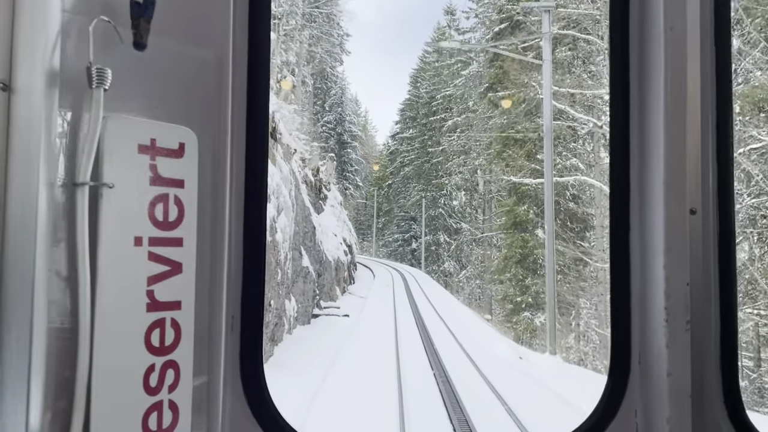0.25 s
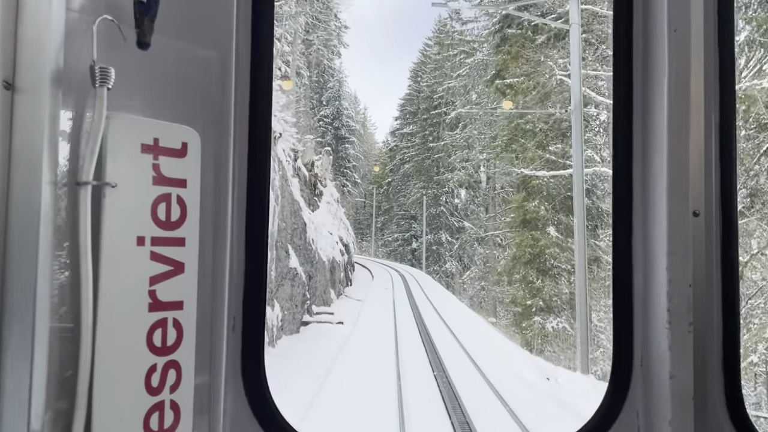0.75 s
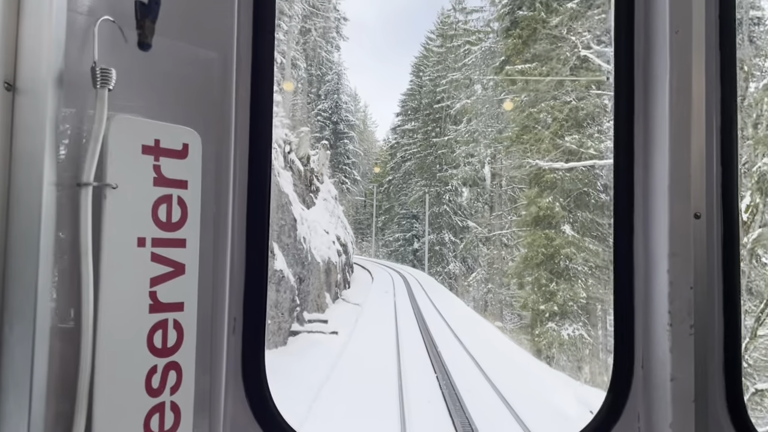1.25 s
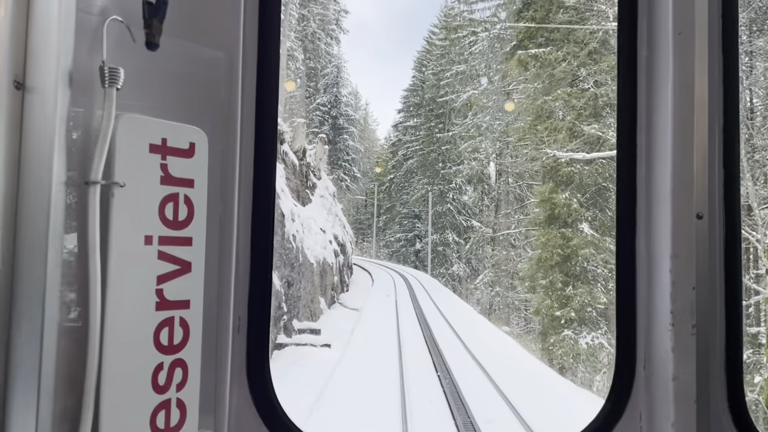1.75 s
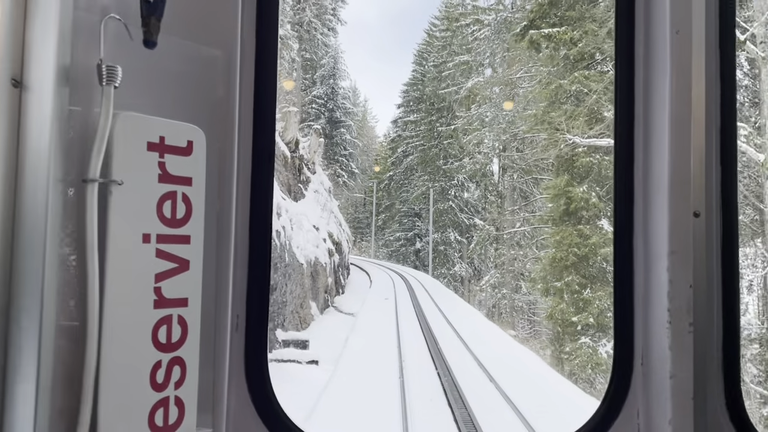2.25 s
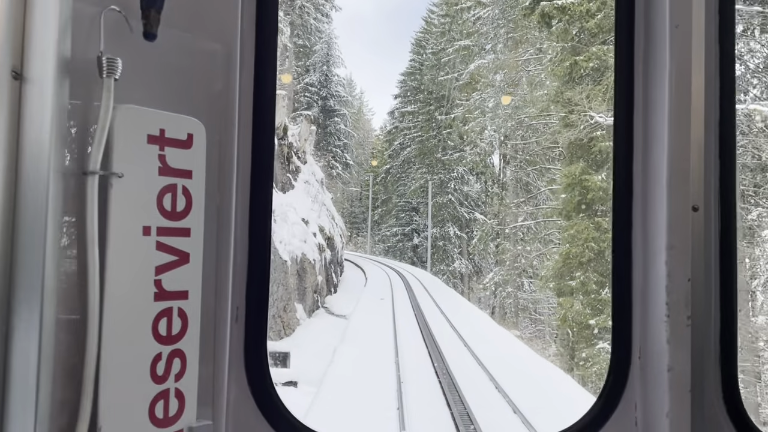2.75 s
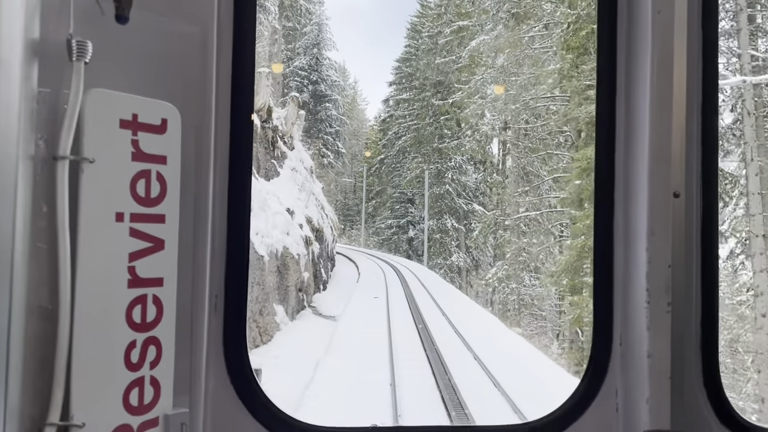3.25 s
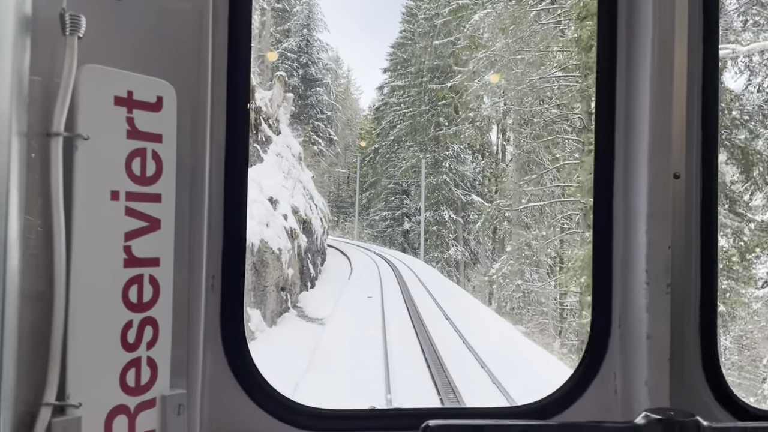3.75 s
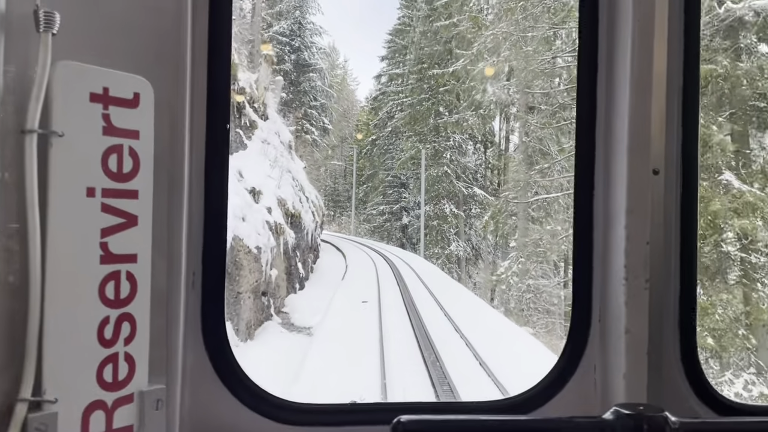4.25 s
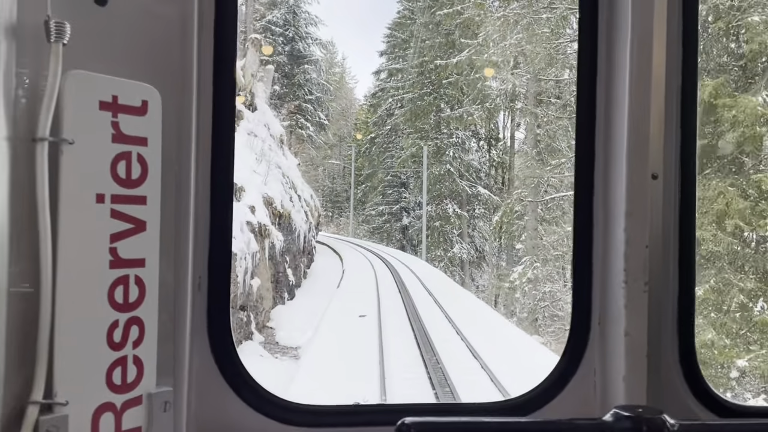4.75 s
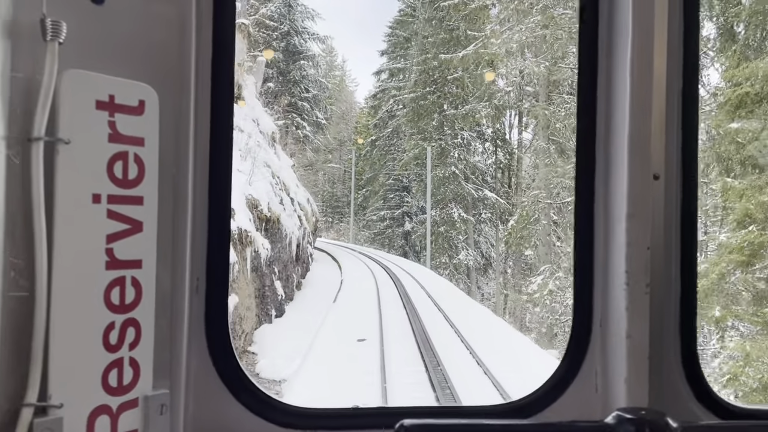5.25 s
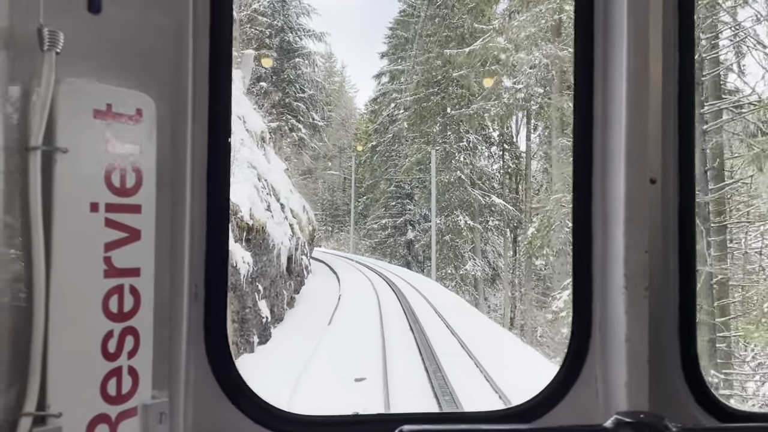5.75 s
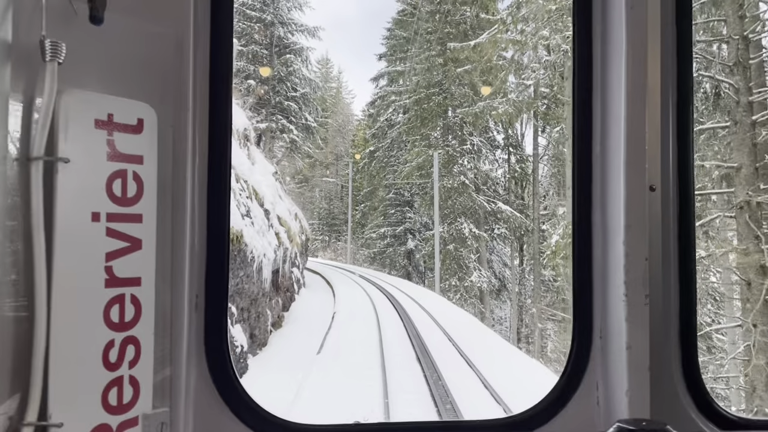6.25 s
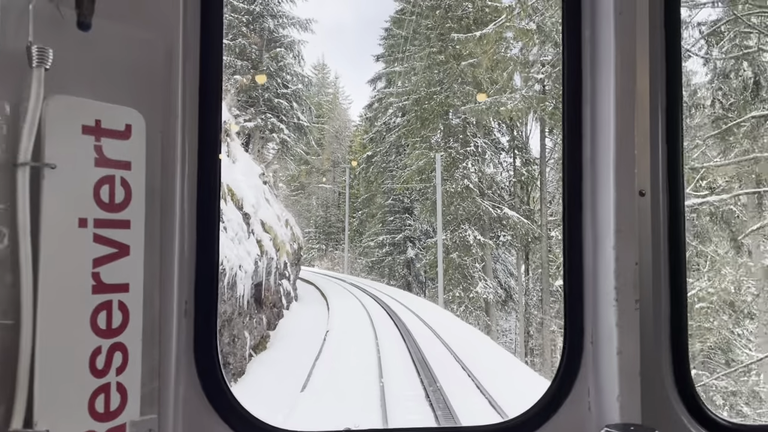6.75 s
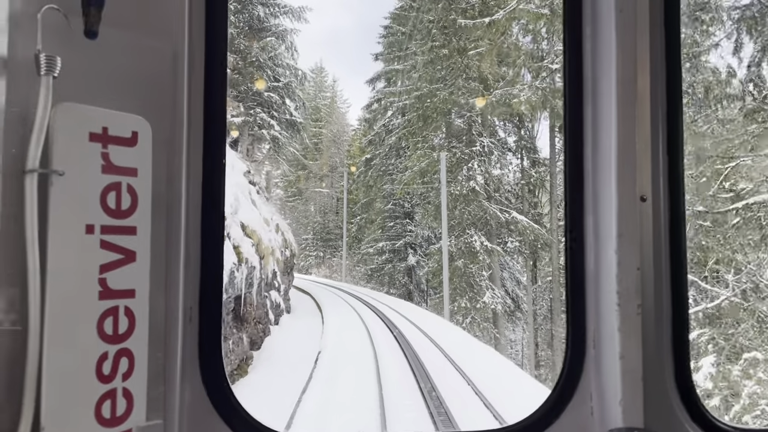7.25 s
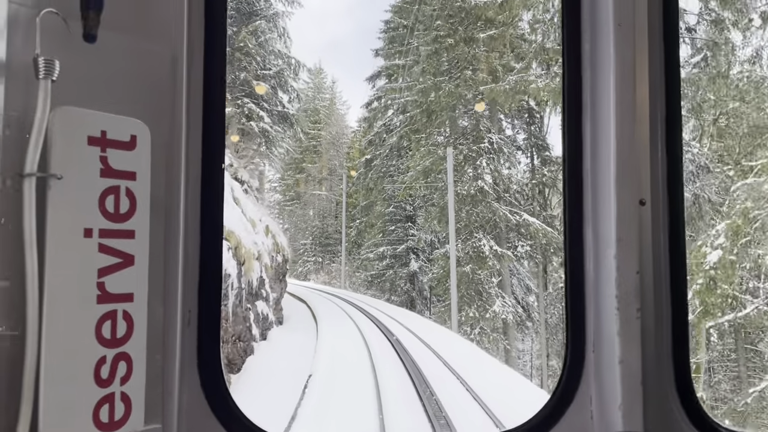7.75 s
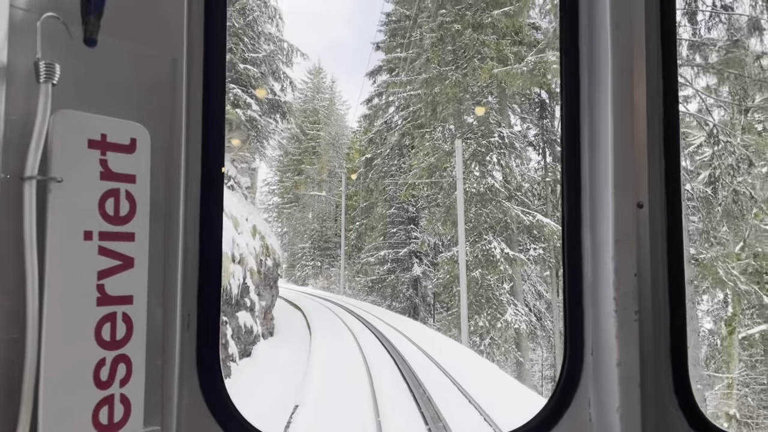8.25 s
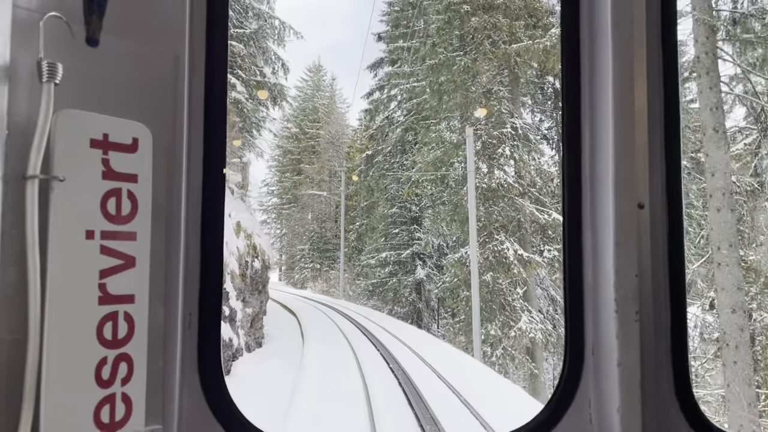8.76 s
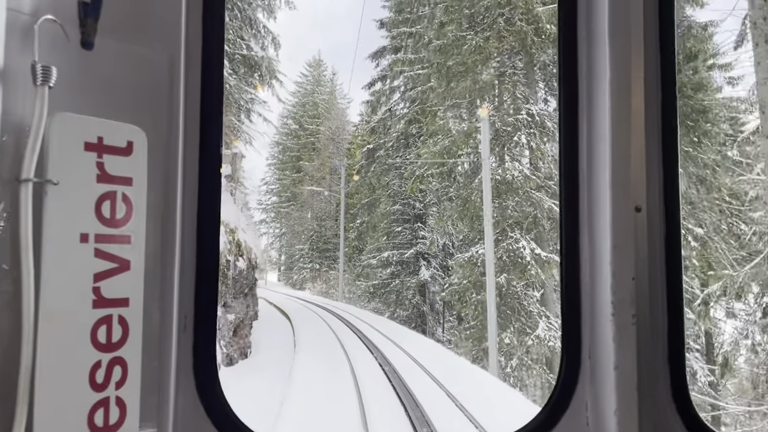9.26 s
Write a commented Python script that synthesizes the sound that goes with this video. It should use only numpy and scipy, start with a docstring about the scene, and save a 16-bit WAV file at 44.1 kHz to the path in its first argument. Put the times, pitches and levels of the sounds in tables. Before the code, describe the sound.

From 0 to 9.5 seconds we are inside the cab of an electric rack train moving steadily. A deep cog hum near 50 Hz sags very slightly in pitch over the first four seconds, its level wavering, over uneven floor boom and low rumble. Panels drum briefly, notably near 2.3 s; motor hum, faint gear whine and soft rolling roar throb almost eight times a second. A clockwork recorder ticks throughout, six crisp metallic ticks a second. From about 0.27 s a lever clacks once each second, followed by a faint rebound. Irregular knocks with gritty scratches and short panel rings come from under the floor: a cluster around 0.9 s, then stronger ones near 4.3, 5.5, 6.8, 8.0, 8.6 and 9.2 s. A very faint high squeak slips downward at 8.45 s. The sound is close, enclosed stereo with short cab reflections, and the drone continues to the end.

```python
"""Driver's cab of an electric rack railway car

A cog wheel hums on the rack at a tooth rate that sags slightly; motor and gears drone through floor and panels.
A clockwork speed recorder ticks six times a second; once a second a lever drops, with a faint rebound.
Knocks come from under the floor, and one faint squeak falls late on.
Hums are wavering tones, rumble and roar shaped noise, blows noise bursts that ring damped modes.
"""
import sys
import numpy as np
from scipy import signal
from scipy.fft import rfft, irfft, next_fast_len
from scipy.io import wavfile
from scipy.ndimage import uniform_filter1d, map_coordinates

SR = 44100
rng = np.random.default_rng(int(sys.argv[2]) if len(sys.argv) > 2 else 0)


def dump_mix(stems):
    """Bounce the given channels to the path in sys.argv[1] as a 16-bit WAV at rate SR."""
    frames = np.atleast_2d(stems).T  # one column per channel
    limited = np.clip(frames, -1, 1)  # hard clip at full scale
    pcm = np.round(limited * 32767).astype(np.int16)
    wavfile.write(sys.argv[1], SR, pcm)


N = 419391


def amp(db):
    """Gain of a level in dB."""
    return 10 ** (np.asarray(db) / 20)


def unit(x):
    """x at rms 1."""
    return x / np.sqrt(np.mean(x ** 2) + 1e-20)


def along(points, hz):
    """Interpolate (Hz, value) points on a log frequency axis."""
    f, v = np.transpose(points)
    return np.interp(np.log(hz + 1), np.log(f + 1), v)


def curves(rows):
    """One value per sample for each column after the time."""
    s, *cols = np.transpose(rows)
    return [np.interp(np.arange(N) / SR, s, c) for c in cols]


def wobble(rate_hz):
    """Smooth random curve, rate_hz knots a second."""
    knots = rng.standard_normal(int(N * rate_hz / SR) + 4)
    return map_coordinates(knots, [np.arange(N) * rate_hz / SR])


def filtered(x, response):
    """x through a complex response of frequency, zero-padded."""
    m = next_fast_len(N + SR // 2)
    return irfft(rfft(x, m) * response(np.fft.rfftfreq(m, 1 / SR)), m)[..., :N]


def coloured(x, spectrum):
    """x through a smooth (Hz, dB) spectrum."""
    return filtered(x, lambda hz: amp(along(spectrum, hz)))


def patches(shape, bins, frames):
    """Smooth random field over frequency and time, rms 1."""
    field = uniform_filter1d(rng.standard_normal(shape), bins, 0)
    return unit(uniform_filter1d(field, frames, 1))


def noise(spectrum, patchy_db):
    """Two unrelated noises, rms 1 over the pair, whose loudness comes in patches."""
    z = signal.stft(rng.standard_normal((2, N)), nperseg=512)[2]
    z = z * amp(patchy_db * patches(z.shape[1:], 5, 8))
    lumpy = signal.istft(z, nperseg=512)[1][:, :N]
    return unit(coloured(lumpy, spectrum))


def resonant(modes):
    """Two unrelated noises ringing in narrow resonances, rms 1 over the pair."""
    def power(hz):
        return sum(amp(db) ** 2 / (1 + (2 * (hz - c) / w) ** 2) ** 2 for c, w, db in modes)
    return unit(filtered(rng.standard_normal((2, N)), lambda hz: np.sqrt(power(hz))))


def hums(modes):
    """Two unrelated sets of driven resonances, each a tone wavering across its width; rms 1 over the pair."""
    def tone(hz, width):
        cycles = np.cumsum(hz + .5 * width * wobble(width)) / SR
        return np.sin(2 * np.pi * (cycles + rng.random()))
    return unit(np.array([sum(amp(db) * tone(hz, width) for hz, width, db in modes) for _ in range(2)]))


# gear shaft speed: start_s, speed_turns_per_s
SHAFT = [(0, 7.97), (3, 7.77), (4, 7.62), (9.51, 7.58)]
# hum of cog teeth meeting the rack: start_s, level_db
COG = [(0, -32), (1.05, -25), (1.7, -39), (2.05, -27.5), (2.55, -33.5), (3.4, -25.5), (4.3, -31),
       (6.2, -25.5), (6.9, -30), (7.4, -23.5), (9.51, -24.5)]
# components of the tooth rate: multiple, mean_level_db
COG_ORDERS = [(1, -2.5), (1.5, -10.5), (2, -13), (3, -17.5)]
TEETH_PER_TURN = 6.32  # rack teeth met per shaft turn


def cog():
    """Tooth rate and its multiples follow the shaft; uneven teeth waver pitch and level."""
    tooth_hz = TEETH_PER_TURN * curves(SHAFT)[0] + 1.245 * wobble(4)
    phase = 2 * np.pi * np.cumsum(tooth_hz) / SR
    orders = sum(amp(db + 2.5 * wobble(4)) * np.sin(k * phase) for k, db in COG_ORDERS)
    return np.sqrt(2) * amp(curves(COG)[0]) * orders


# floor boom level: start_s, level_db
BOOM = [(0.0, -34), (0.18, -21), (0.32, -40), (0.58, -26), (2.15, -28.5), (2.41, -17.5), (3.04, -27.5),
        (3.15, -20.5), (3.26, -28), (3.34, -25), (3.84, -27.5), (3.94, -19), (4.02, -32), (4.55, -21.5),
        (4.58, -27), (5.01, -30), (5.03, -21), (5.19, -26), (6.33, -32), (6.41, -17), (6.46, -20.5),
        (7.49, -31), (7.55, -20), (7.63, -33), (8.16, -24.5), (8.26, -27.5), (8.9, -20), (9.0, -38),
        (9.24, -20), (9.51, -21)]
# floor resonances: freq_hz, width_hz, level_db
FLOOR = [(41.2, 2.7, -14), (54.05, 8, -7), (62.65, 6, -5.5), (70.63, 6, 2), (75.96, 6, 2),
         (86.4, 17, -11.5)]
# rumble spectrum: freq_hz, level_db_per_hz
RUMBLE = [(12, -40), (24, 2), (32, 4.5), (40, -2), (70, 11.5), (110, 2), (200, -6.5), (300, -18),
          (500, -72)]
RUMBLE_DB, RUMBLE_FOLLOWS = -1.5, .33  # dB re mean boom; share of the boom's dB swings followed


def floor_boom():
    """Shaken floor: low resonances over a rumble that partly follows their level."""
    boom_db = curves(BOOM)[0]
    mean_db = boom_db.mean()
    rumble_db = RUMBLE_DB + mean_db + RUMBLE_FOLLOWS * (boom_db - mean_db)
    boom = amp(boom_db + .2 * wobble(3.5)) * hums(FLOOR)
    return boom + amp(rumble_db) * noise(RUMBLE, patchy_db=3)


# panel drumming level: start_s, level_db
DRUM = [(0.0, -41), (0.02, -37.5), (1.08, -32.5), (1.19, -41), (2.17, -30.5), (2.27, -32), (2.3, -19),
        (2.51, -44.5), (2.83, -28.5), (2.91, -39.5), (3.63, -40.5), (3.71, -31), (4.08, -40), (4.85, -26),
        (5.09, -31.5), (5.14, -39), (7.05, -36), (7.12, -42.5), (7.84, -27.5), (7.92, -38.5), (8.18, -25.5),
        (8.58, -31), (9.3, -30.5), (9.51, -44)]
# panel resonances: freq_hz, width_hz, level_db
PANELS = [(149.7, 5, -8), (171.5, 8, -0.5), (180.9, 9, -6), (200.5, 6.5, -9.5)]


def panel_drumming():
    """Shaken cab panels drum as wavering resonances."""
    return amp(curves(DRUM)[0] + 1.22 * wobble(7.3)) * hums(PANELS)


# motor hum level: start_s, level_db
MOTOR_LEVEL = [(0, -50), (2, -40), (2.5, -38), (4.5, -38.5), (5.1, -52), (5.5, -31), (6.5, -45), (7.5, -56),
               (8.6, -35), (9.51, -34.5)]
# motor hum: freq_hz, width_hz, level_db
MOTOR = [(126.8, 4, 0)]


def motor_hum():
    """One motor tone wavering in pitch and level."""
    return amp(curves(MOTOR_LEVEL)[0] + wobble(3.9)) * hums(MOTOR)


SHAFT_START_TURNS = .18  # past the tight spot at 0 s


def mesh_throb():
    """The gear mesh tightens once a shaft turn: a cosine of the turn, -1 to 1."""
    return np.cos(2 * np.pi * (np.cumsum(curves(SHAFT)[0]) / SR + SHAFT_START_TURNS))


# rolling levels: start_s, housing_db, roar_db
ROLL = [(0.0, -39, -38.5), (2.07, -41.5, -39), (2.51, -36, -38), (3.58, -43.5, -40), (4.74, -37.5, -39.5),
        (5.11, -38.5, -37.5), (6.65, -40, -39), (9.16, -37, -38.5), (9.51, -33.5, -39.5)]
# gearbox housing resonances: freq_hz, width_hz, level_db
GEARS = [(258, 31.6, -3.5), (282.7, 10.2, -2), (310.4, 30, -3), (348.6, 23, -7), (391.4, 14, -4),
         (496.5, 20, -9.5), (534, 17, -12.5)]
# rolling roar spectrum: freq_hz, level_db_per_hz
ROAR = [(150, -15), (250, -3.5), (500, -3.5), (700, -5), (1200, -9.5), (1800, -16), (2400, -15),
        (3100, -25), (4500, -23.5), (7000, -30.5), (9500, -35.5), (12500, -42), (15700, -46)]


def gearbox_and_roar():
    """Noise rings the gearbox housing, broad noise makes the rolling roar; both throb with the mesh."""
    housing_db, roar_db = curves(ROLL)
    throb = mesh_throb()
    housing = amp(housing_db + .85 * throb + 1.25 * wobble(15) + 1.26 * wobble(4.6)) * resonant(GEARS)
    roar = amp(roar_db + throb + 1.68 * wobble(20)) * noise(ROAR, patchy_db=1.5)
    return housing + roar


# gear tone levels: start_s, lower_db, upper_db
WHINE = [(0, -53, -43.5), (.9, -40.5, -50), (1.5, -50, -47.5), (2.6, -41.5, -43.5), (3.1, -44.5, -41.5),
         (3.75, -51, -49), (4.3, -45, -49), (5.4, -44.5, -44), (6.2, -42, -54), (7.3, -44, -53),
         (8.4, -40.5, -46), (9.51, -43.5, -48)]
# lower gear tone: freq_hz, width_hz, level_db
LOWER_GEAR = [(432, 14, 0), (415, 20, -8)]
# upper gear tone: freq_hz, width_hz, level_db
UPPER_GEAR = [(460, 11, 0), (478, 20, -6.5)]


def gear_whine():
    """Two wavering gear tones, throbbing with the mesh."""
    lower_db, upper_db = curves(WHINE)
    throb = mesh_throb()
    lower = amp(lower_db + 6 * throb + 1.5 * wobble(18)) * hums(LOWER_GEAR)
    upper = amp(upper_db + 2.8 * throb + 2.5 * wobble(12)) * hums(UPPER_GEAR)
    return lower + upper


# decay in the cab air: freq_hz, t60_s
CAB = [(500, 0.65), (2200, 0.29), (5000, 0.19), (12000, 0.14)]
LEAD_IN_S = .03  # before a blow, parts may already scrape
RATTLE_S = .0086  # parts rattle on this long after a blow before the sound fades


def bursts(count, ragged_db):
    """A fresh pair of ragged noises per blow, steady while it rattles, then each frequency dies in the cab."""
    hz, t, z = signal.stft(rng.standard_normal((count, 2, SR // 3)), SR, nperseg=128)
    fading = amp(-60 * np.maximum(t - LEAD_IN_S - RATTLE_S, 0) / along(CAB, hz)[:, None])
    ragged = np.array([amp(ragged_db * patches(z.shape[2:], 3, 6)) for _ in range(count)])
    return signal.istft(z * fading * ragged[:, None], SR, nperseg=128)[1]


DAMPED_ABOVE_HZ = 2600  # higher modes die faster in proportion to pitch
DETUNE = .003  # rms pitch ratio shift: where each blow lands


def metal_ring(modes, metal_db, t60_s):
    """Impulse response of struck metal: damped sines, a few ms slow to speak."""
    t = np.arange(SR // 8) / SR
    ring = 0
    for hz, mode_db in modes:
        level_db = mode_db + along(metal_db, hz) + rng.normal(0, 1.2)
        decay_db = 60 * t / t60_s * max(1, hz / DAMPED_ABOVE_HZ)
        ring = ring + amp(level_db - decay_db) * np.sin(2 * np.pi * hz * rng.normal(1, DETUNE) * t)
    return ring * (1 - np.exp(-t / .0049))


GRAIN_DB, GRAINS_PER_S = 1.2, 350  # the rattle is a run of small uneven contacts
RING_DRIVE_T60_S = .14  # the rattle stops driving the metal sooner than its echo leaves the cab


def clockwork(events, rises_s, clicks_db, modes, t60_s, spectrum, snap_db, ring_db):
    """Each (start_s, peak_db, metal_db) event scrapes up to a blow; its rattle rings the metal."""
    snaps, rings = np.zeros((2, N + SR)), np.zeros((2, N + SR))
    grain_db = GRAIN_DB * np.tile(wobble(GRAINS_PER_S), 2)
    noises = bursts(count=len(events), ragged_db=1.5)
    for (s, db, metal_db), rise_s, click_db, heard in zip(events, rises_s, clicks_db, noises):
        since_s = np.arange(heard.shape[1]) / SR - LEAD_IN_S
        # the scrape swells into a rounded top
        swell_db = -20 * (np.minimum(since_s, 0) / rise_s) ** 2
        heard = heard * amp(swell_db + grain_db[round(s * SR):][:len(since_s)])
        heard[:, round(LEAD_IN_S * SR)] += amp(click_db + rng.normal(0, 2.5))

        ring = metal_ring(modes, metal_db, t60_s)
        drive = heard * amp(-60 * np.maximum(since_s - RATTLE_S, 0) / RING_DRIVE_T60_S)
        rung = signal.fftconvolve(drive, ring[None], axes=1)
        # like blows put like energy into the metal
        energy = np.linalg.norm(ring) * np.linalg.norm(drive, axis=1)
        rung = rung * (energy / np.linalg.norm(rung, axis=1))[:, None]

        start = round((s - LEAD_IN_S) * SR)
        snaps[:, start:start + heard.shape[1]] += amp(db + snap_db) * heard
        rings[:, start:start + rung.shape[1]] += amp(db + ring_db) * rung
    return coloured(snaps[:, :N], spectrum) + rings[:, :N]


# clockwork beats, relative levels: start_s, peak_db, lower_case_ring_db, upper_case_ring_db
TICKS = [(0.0585, -26.5, -16.5, -7), (0.2262, -27, -7, -17), (0.3924, -27.0, -8, -11),
         (0.5575, -25, -0.5, -13), (0.7236, -26, -3, -3), (0.8876, -24, -9, -10), (1.0514, -26.5, -6, -8),
         (1.2166, -25.5, -8, -9), (1.3826, -26.5, -18, -4), (1.5488, -28, -2, -11), (1.7155, -26, -1, -10),
         (1.8811, -27.5, -7, -14), (2.048, -25.5, -14, -10), (2.2133, -26.5, -5, -15),
         (2.3789, -26.5, -5, -12), (2.5461, -26, -5, -9), (2.7146, -26, 0.5, -17), (2.8783, -25.5, -2, -16),
         (3.044, -26.5, -9, -6), (3.2118, -27, -1.5, -15), (3.3785, -26, -9, -5), (3.545, -29, -1, -8),
         (3.7122, -27.0, 1, -14), (3.8774, -27, -6, -6), (4.0416, -25.5, -9, -7), (4.2099, -25.5, -9, -17),
         (4.3774, -26.5, -3, -7), (4.5414, -26, -3, -11), (4.7092, -27.0, -3, -4), (4.8746, -26, -8, -6),
         (5.041, -26, -6, -11), (5.2055, -27, -17, -16), (5.3732, -26, -16, -2), (5.5383, -26.5, -4, -12),
         (5.7055, -25.5, -10, -11), (5.8709, -26, -3, -6), (6.0367, -24.5, -13, -24),
         (6.2014, -25, -12, -7.0), (6.3678, -25, -12, -2), (6.5334, -25.5, -11, -11), (6.6984, -28, -5, -3),
         (6.8643, -27.5, -5, -5.5), (7.0296, -25.5, -8, -8.5), (7.2011, -25.5, -17, -11),
         (7.3668, -25.5, -17, -9), (7.5336, -24.5, -8, -18), (7.7012, -26, -1, -7), (7.8661, -24.5, -5, -8),
         (8.0324, -25.5, -16, -11), (8.1985, -25.5, -11, -10), (8.367, -27, -17, -6),
         (8.5317, -26, -18, -18), (8.6989, -25.5, -7, -9), (8.8624, -27, 0.5, -14), (9.0267, -27, -7, -5),
         (9.1949, -24, -8, -12), (9.3619, -26, -17, -5)]
# recorder case modes: freq_hz, level_db
CASE = [(1270, -4), (1385, 1.5), (1610, 0), (1954, -9.5), (2005, 4), (2078, 6.5), (2160, 4), (2240, 6.5),
        (2290, 8), (2398, 7), (2804, -0.5), (3520, 0.5), (5310, 2), (8450, 1), (9500, -1)]
# beat contact spectrum: freq_hz, level_db_per_hz
SNAP = [(300, -33), (900, 1.5), (1800, -2.5), (3000, 1.5), (5000, -1.5), (7000, -2), (9500, -6.5),
        (12500, -14), (15700, -9)]
BEATS_A_ROUND = 6  # the second beat of each round lifts the lever
CASE_T60_S, CASE_RING_DB = .034, -6.5  # ring_db: the remaining modes


def ticks():
    """Clockwork beats snap and ring the recorder case; a lever-lifting beat scrapes longer."""
    events = [(s, db, [(1750, CASE_RING_DB), (2050, lower), (2340, upper), (2650, CASE_RING_DB)])
              for s, db, lower, upper in TICKS]
    lifting = np.arange(len(TICKS)) % BEATS_A_ROUND == 1
    return clockwork(events, np.where(lifting, .009, .006), np.full(len(TICKS), 8.5),
                     CASE, CASE_T60_S, SNAP, snap_db=-4.5, ring_db=-22.5)


# lever drops, relative levels: start_s, peak_db, main_mode_ring_db
DROPS = [(.273, -28.5, -11), (1.2665, -27, -12), (2.263, -28, -7), (3.263, -28, -6), (4.259, -28, -9),
         (5.256, -29, 1), (6.2515, -28, -5), (7.247, -27, -17), (8.247, -26.5, -16), (9.2445, -26.5, -17)]
# faint rebound, offsets from its drop: delay_s, peak_db, ring_db
REBOUND = (.062, -8.5, -7)
# lever modes: freq_hz, level_db
LEVER = [(2010, 4), (2370, 4), (2810, 9.5), (4700, 2), (5310, 8), (5750, -14), (6130, -2)]
# lever contact spectrum: freq_hz, level_db_per_hz
CLACK = [(600, -23), (1500, -13.5), (3000, 0.5), (3700, -10), (5500, 2), (6500, -3), (7500, -12.5),
         (10000, -12), (12500, -26), (15700, -21)]
LEVER_T60_S, LEVER_RING_DB = .016, -7  # ring_db: the remaining modes


def lever_drops():
    """A falling lever clacks and rings, then rebounds with a slower rise and a weaker click."""
    falls = np.concatenate([DROPS, np.add(DROPS, REBOUND)])
    events = [(s, db, [(2500, LEVER_RING_DB), (2810, main), (3200, LEVER_RING_DB)])
              for s, db, main in falls]
    firm = np.arange(len(falls)) < len(DROPS)
    return clockwork(events, np.where(firm, .005, .009), np.where(firm, 14, 3),
                     LEVER, LEVER_T60_S, CLACK, snap_db=-.1, ring_db=-15.5)


# knocks under the floor, thud and scratch before trim:
# start_s, thud_db, thud_and_scratch_t60_s, scratch_db, panel_ring_hz, ring_db
KNOCKS = [(0.454, -38, 0.092, -34, 910, -38), (.845, -39, 0.079, -33, 930, -33),
          (.873, -25, 0.32, -43, 486, -46), (0.968, -29, 0.17, -35, 476, -33),
          (1.005, -30, 0.27, -30, 1370, -36), (1.475, -40, 0.1, -35, 1640, -39),
          (2.505, -33, 0.11, -30, 775, -34), (2.637, -40, .22, -38, 433, -36),
          (3.145, -32, 0.12, -47, 900, -34), (4.324, -21, .14, -31, 790, -38),
          (4.826, -37, 0.19, -21.5, 1350, -33), (5.105, -30, 0.099, -32, 795, -33),
          (5.468, -18.5, 0.34, -33, 596, -27), (5.847, -46, 0.24, -21.5, 1370, -36),
          (6.073, -36, 0.16, -27, 1420, -37), (6.822, -20, 0.054, -28, 450, -42),
          (7.615, -40, .12, -32, 900, -42), (8.009, -24.5, 0.24, -30, 417, -27),
          (8.625, -18, .35, -34, 1195, -35), (8.674, -27, .12, -32, 400, -37),
          (9.206, -20.5, 0.21, -47, 408, -46)]
# thud spectrum: freq_hz, level_db_per_hz
THUD = [(200, -20), (450, 9.5), (650, -13), (900, -13), (1400, -20), (3000, -57)]
# scratch spectrum: freq_hz, level_db_per_hz
SCRATCH = [(500, 2), (900, 2), (1380, 4), (1800, -3.5), (2800, -5), (4500, -17.5), (6500, -23),
           (14000, -48)]
THUD_TRIM_DB, SCRATCH_TRIM_DB, KNOCK_RING_T60_S = -6.5, -6, .06


def knocks():
    """Running-gear blows: a low noise puff, gritty scratch and a short damped sine of the struck panel."""
    low, high, ring = np.zeros(N + SR), np.zeros(N + SR), np.zeros(N + SR)
    t = np.arange(SR // 2) / SR
    for s, thud_db, t60_s, scratch_db, hz, ring_db in KNOCKS:
        span = slice(round(s * SR), round(s * SR) + len(t))
        decay_db = -60 * t / t60_s
        low[span] += amp(thud_db + THUD_TRIM_DB + decay_db) * (1 - np.exp(-t / .0074))
        high[span] += amp(scratch_db + SCRATCH_TRIM_DB + decay_db) * (1 - np.exp(-t / .004))
        ring_env = amp(ring_db - 60 * t / KNOCK_RING_T60_S) * (1 - np.exp(-t / .0021))
        ring[span] += ring_env * np.sin(2 * np.pi * hz * t)
    thud = low[:N] * noise(THUD, patchy_db=2.5)
    grit = amp(3 * wobble(200))
    scratch = high[:N] * grit * noise(SCRATCH, patchy_db=1.2)
    # gains into the channels' shared and own parts
    return thud + scratch + ring[:N] * np.array([[1.6], [.4]])


# squeak: start_s, pitch_hz, level_db
SQUEAK = [(8.435, 5060, -90), (8.45, 5050, -48), (8.472, 5060, -48), (8.49, 4920, -54), (8.525, 4880, -55),
          (8.54, 4870, -100)]


def squeak():
    """One faint falling sine, blurred by fast random level."""
    hz, db = curves(SQUEAK)
    blur = np.array([1 + .8 * wobble(350), .8 * wobble(350)])
    return amp(db) * blur * np.sin(2 * np.pi * np.cumsum(hz) / SR)


# left-right likeness: freq_hz, likeness_0_to_1
ALIKE = [(60, .99), (130, .95), (290, .8), (640, .25), (1500, .3), (3000, .6), (5500, .55), (7000, .75),
         (7900, .99), (8400, .99), (9800, .82), (11000, .99), (12000, .99), (13000, .7), (14400, .99)]
# phase by which the left channel leads: freq_hz, lead_rad
LEAD = [(0, 0), (2300, 0), (2700, .9), (3800, 0), (5200, .8), (5700, 0), (7000, -1.5), (8100, -3.14),
        (10800, -6.15), (12100, -6.3), (14500, -9.4), (16000, -9.6)]
# left over right level: freq_hz, level_db
LEFT = [(60, 0), (110, 5.5), (200, 2.5), (380, 0), (700, 3), (1290, 1.5), (2380, 3.5), (4400, 3),
        (8120, -0.5), (15000, 1)]


def stereo_image(pair):
    """Stereo image: left-right likeness, level difference and phase vary with pitch."""
    def angle(hz):
        return np.arccos(np.clip(along(ALIKE, hz), 0, 1)) / 2

    side = np.array([[.5], [-.5]])

    def channel_response(hz):
        lead_rad = np.interp(hz, *np.transpose(LEAD))
        return amp(side * along(LEFT, hz)) * np.exp(1j * side * lead_rad)

    shared, own = filtered(pair, lambda hz: np.array([np.cos(angle(hz)), np.sin(angle(hz))]))
    return filtered(np.array([shared + own, shared - own]), channel_response)


def scene():
    """Drone, ticking speed recorder, knocks and squeak in two channels."""
    drone = cog() + floor_boom() + panel_drumming() + motor_hum() + gearbox_and_roar() + gear_whine()
    return stereo_image(drone + ticks() + lever_drops() + knocks() + squeak())


TOP_HZ = 15850


def record(dry):
    """Brick-wall low-pass: nothing from TOP_HZ up."""
    return filtered(dry, lambda hz: hz < TOP_HZ)


dry = scene()
out = record(dry)
dump_mix(out)
```